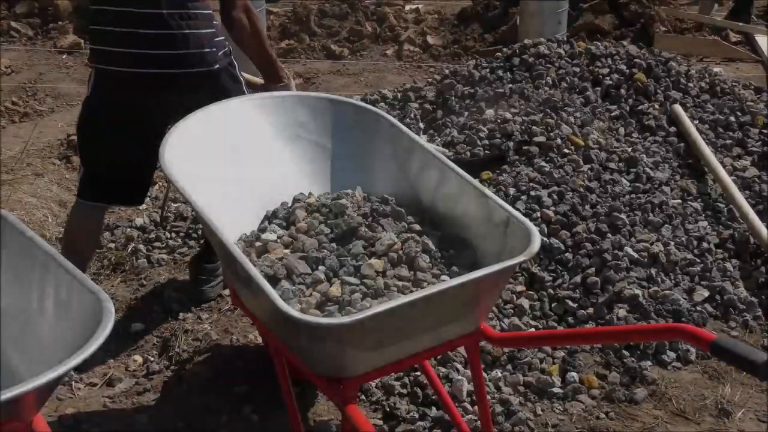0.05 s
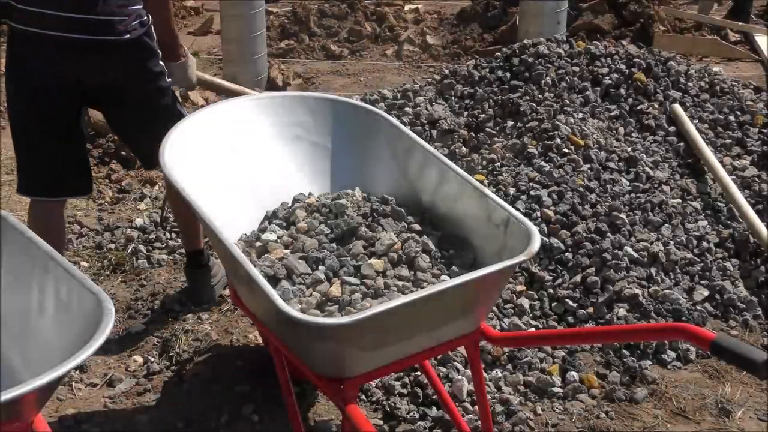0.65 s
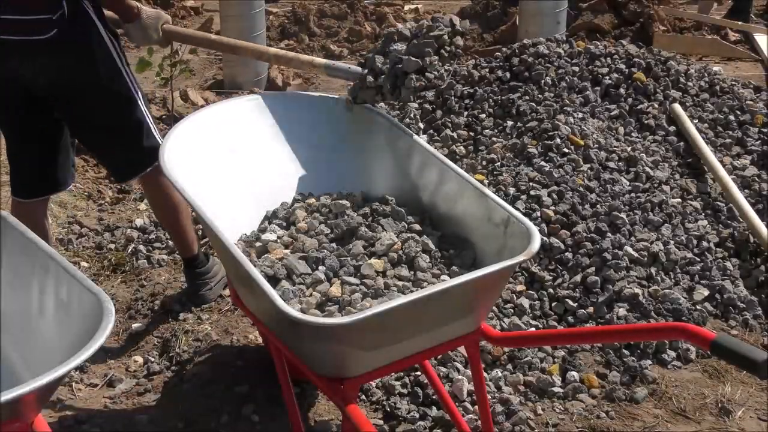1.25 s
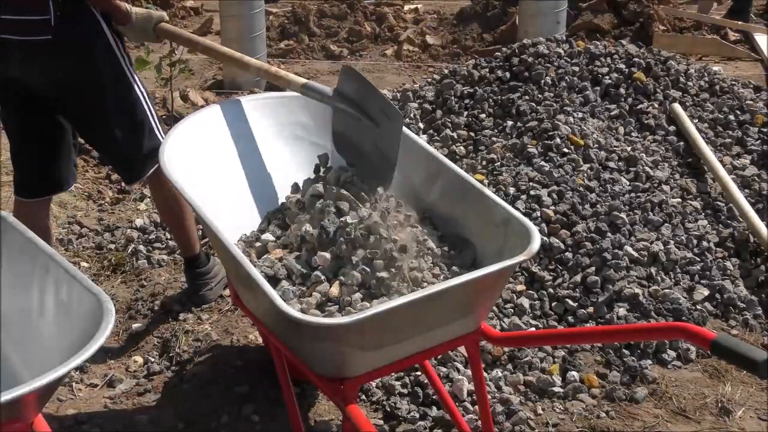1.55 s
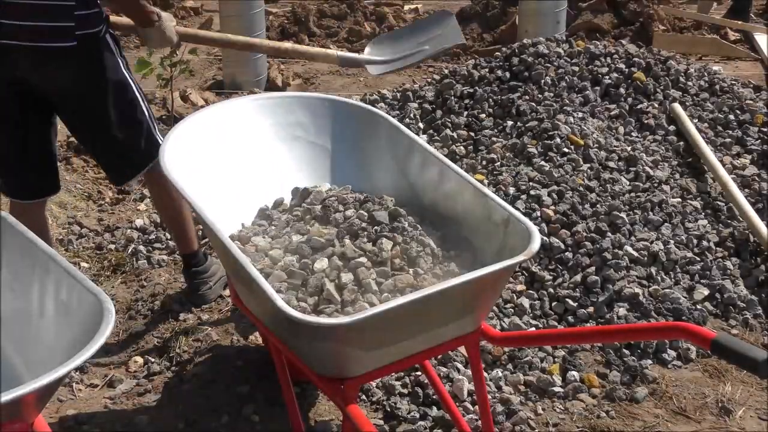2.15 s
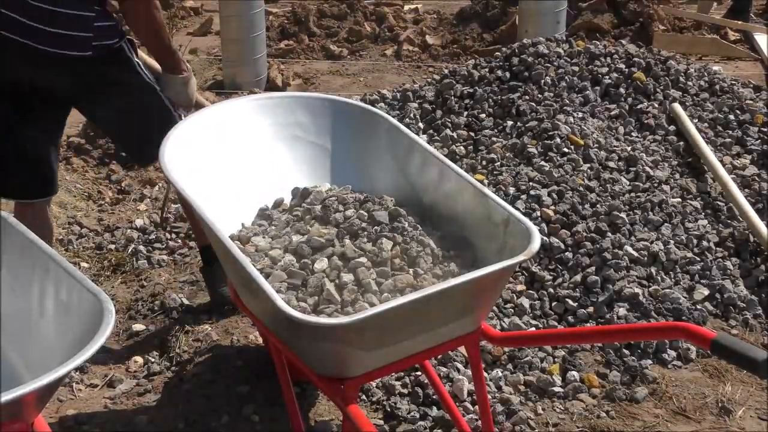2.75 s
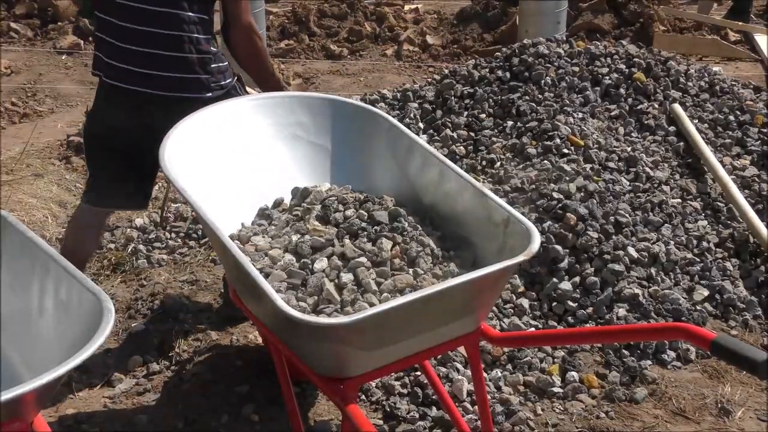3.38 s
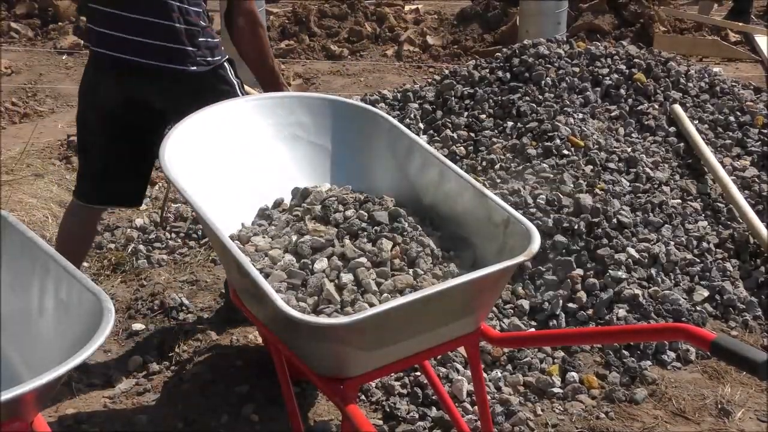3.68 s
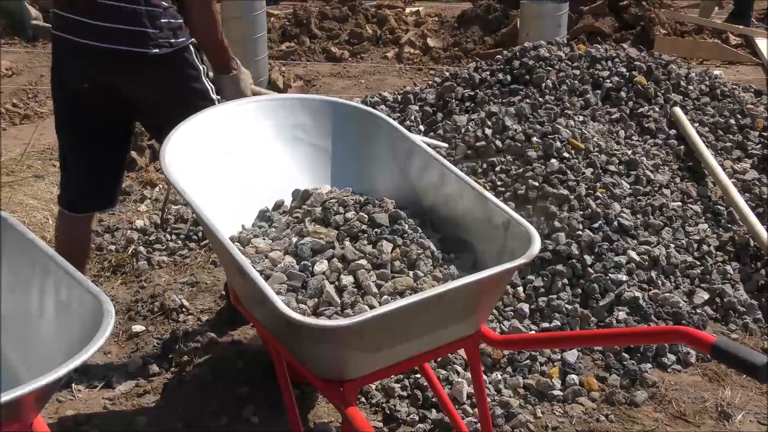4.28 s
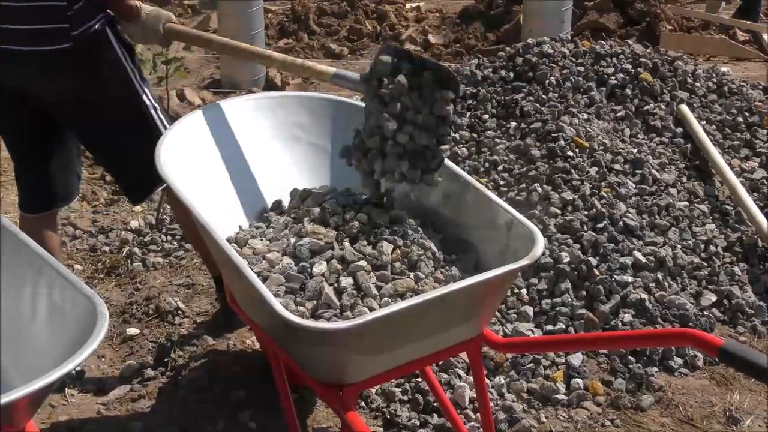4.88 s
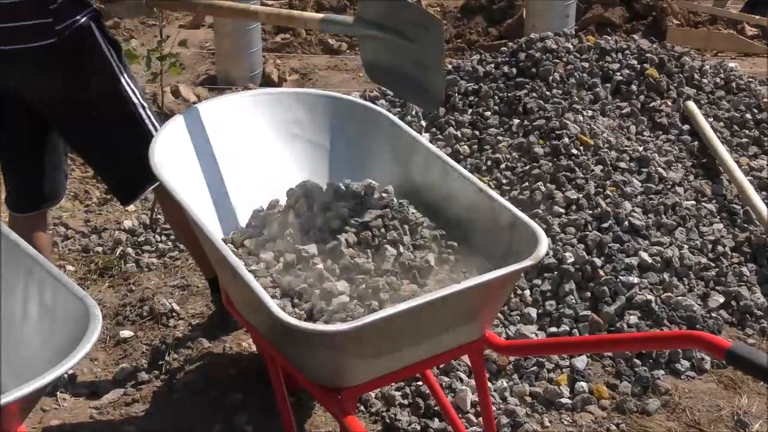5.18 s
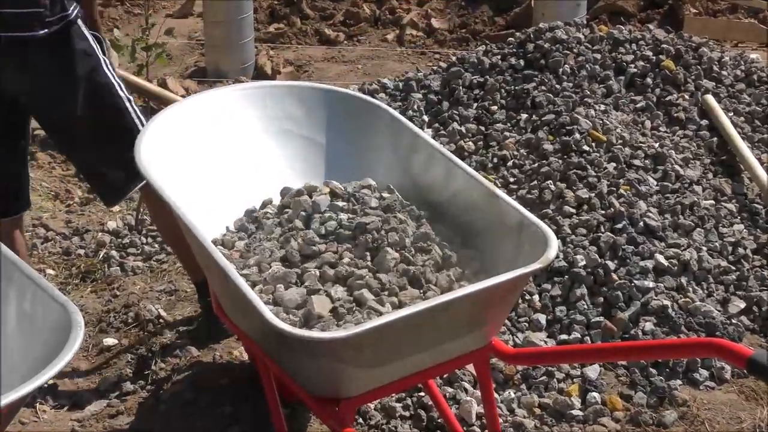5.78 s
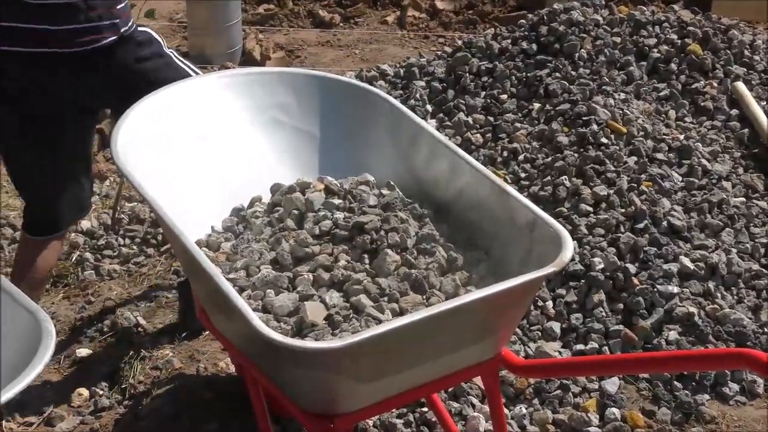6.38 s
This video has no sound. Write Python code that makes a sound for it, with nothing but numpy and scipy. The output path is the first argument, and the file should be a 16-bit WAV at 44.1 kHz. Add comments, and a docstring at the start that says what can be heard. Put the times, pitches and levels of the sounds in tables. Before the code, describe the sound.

A shovel scrapes and crunches into crushed stone and twice tips a clattering load into a metal wheelbarrow outdoors.

```python
"""Crushed stone is shovelled into a part-filled steel wheelbarrow, outdoors.
Each load slides off the ringing blade and drums into the tray, where the last stones tumble to rest.
In the pile the blade crunches and scrapes, and loose stones knock and trickle back.
Every stream of stone is a swarm of tiny noisy clacks; the steel adds its ringing modes.
At the start the blade hisses and sings as it is drawn out, over a faint bed of open air."""
import sys
import numpy as np
from scipy import signal
from scipy.io import wavfile
from scipy.ndimage import uniform_filter1d

SR = 44100
rng = np.random.default_rng(int(sys.argv[2]) if len(sys.argv) > 2 else 0)


def wav_record(signal):
    """Record a signal, one row per channel, as 16-bit PCM in the file named by sys.argv[1]."""
    frames = np.transpose(np.atleast_2d(signal))
    bounded = np.clip(frames, -1, 1)
    # unit amplitude maps onto the largest positive 16-bit level
    quanta = np.round(bounded * 32767).astype(np.int16)
    wavfile.write(sys.argv[1], SR, quanta)


N = 292499
TIME = np.arange(N) / SR


def amp(db):
    return 10 ** (np.asarray(db) / 20)


def unit_rms(x):
    return x / np.sqrt(np.mean(x ** 2) + 1e-20)


def steadied(x, size=1500):
    """Rides the level to rms 1 while single grains still stand out."""
    power = uniform_filter1d(uniform_filter1d(x ** 2, size), size)
    return x / np.sqrt(abs(power) + 1e-12)


def through(x, response):
    """Convolves, keeping the length."""
    return signal.oaconvolve(x, response)[:len(x)]


def surge(start, length, attack_s, release_db_per_s):
    """Envelope: a straight attack, a hold, then an even fall in dB."""
    age = TIME - start
    return np.clip(age / attack_s, 0, 1) * amp(-release_db_per_s * np.maximum(age - length, 0))


def colour(x, curve, size=4096):
    """Minimum-phase EQ, so attacks stay sharp; the top of the curve is set to 0 dB."""
    hz, db = np.transpose(curve)
    bins_hz = abs(np.fft.fftfreq(size, 1 / SR))
    gain_db = np.interp(np.log(bins_hz + 1), np.log(hz + 1), db - db.max())
    spectrum = np.exp(np.conj(signal.hilbert(np.log(amp(gain_db) + 1e-5))))
    return through(x, np.fft.ifft(spectrum).real[:size // 2])


def noise_band(hz, width_hz):
    """Noise through a steep resonance that glides along the curve hz; rms 1."""
    turn = np.exp(2j * np.pi * np.cumsum(hz) / SR)
    r = np.exp(-np.pi * width_hz / SR)
    band = signal.lfilter([(1 - r) ** 2], [1, -2 * r, r * r], rng.standard_normal(N) / turn)
    return unit_rms((turn * band).real)


def ring(x, modes, spot_db=4):
    """The bare contact plus the steel's modes; each spot that is struck favours other modes."""
    out = x.copy()
    for hz, db, t60 in modes:
        spots = rng.standard_normal(len(x) // 1500 + 2)
        wander = np.interp(np.arange(len(x)) / 1500, np.arange(len(spots)), spots)
        drive = x * amp(db + spot_db * wander)
        r = np.exp(-np.log(1000) / t60 / SR)
        r_cos = r * np.cos(2 * np.pi * hz / SR)
        out += signal.lfilter([2 * (1 - r), -2 * (1 - r) * r_cos], [1, -2 * r_cos, r * r], drive)
    return out


def clack(hz, t60, q, bare):
    """One stone: a fast-dying chatter of rough contacts, through a resonance set by its size."""
    t = TIME[:SR // 12]
    chatter = rng.standard_normal(len(t)) * amp(-60 * t / max(t60, .002))
    body = signal.lfilter(*signal.iirpeak(np.clip(hz, 150, 9000), q, fs=SR), chatter)
    return unit_rms(body + bare * chatter)


def gravel(flow, peak_per_s, spread_db, nominal_t60, q, sizes=36):
    """Stones of mixed size collide at random, more often in a stronger flow, a few much harder."""
    out = np.zeros(N)
    odds = peak_per_s * (flow / flow.max()) ** .6 / sizes / SR
    for hz in np.linspace(500, 9000, sizes) * rng.uniform(.9, 1.1, sizes):
        chance = rng.random(N)
        at = np.flatnonzero(chance < odds)
        force = np.minimum(-np.log(chance[at] / odds[at]), 3.5)
        clicks = np.zeros(N)
        clicks[at] = amp(spread_db * force)
        out += through(clicks, clack(hz, nominal_t60 * rng.uniform(0.21, 3.5), q, bare=0.52))
    return out


def blows(cues, curve, modes, chatter_t60, rattle_db, rattle_t60, tilt_db=0):
    """Single hard knocks, each followed by the small rattle of the neighbours that it shifts."""
    out, t = np.zeros(N), TIME[:SR // 4]
    median_hz = np.median(np.array(cues)[:, 2])
    for start, db, hz in cues:
        rattle = rng.standard_normal(len(t)) * (rng.random(len(t)) < 900 / SR)
        rattle *= amp(-60 * t / rattle_t60)
        contacts = amp(rattle_db) * rattle / np.linalg.norm(rattle)
        contacts[0] = 1  # the blow itself
        slope = tilt_db * np.log2(hz / median_hz)  # the stone's pitch tilts the EQ
        tilted = [(f, level + slope * np.log2(np.clip(f, 300, 7000))) for f, level in curve]
        bite = clack(hz, chatter_t60, q=1.9, bare=0.7)
        bite *= np.minimum(TIME[:len(bite)] / 0.0028, 1)  # rough faces take a moment to bite
        knock = ring(colour(through(contacts, bite), tilted), modes)
        attack_rms = np.sqrt(np.mean(knock[:SR // 160] ** 2))
        slot = out[round(start * SR):][:len(knock)]
        slot += amp(db) * knock[:len(slot)] / attack_rms
    return out


# EQ of the outdoor bed: (frequency [Hz], relative level [dB])
AIR_EQ = [(12, -25), (20, -3.5), (33, -13.5), (70, -6.5), (118, -18.5), (153, -12.5), (252, -11.5),
          (715, -3.5), (1030, -9.5), (1340, -8), (2030, -16), (3510, -22.5), (7300, -29), (10200, -33.5),
          (13300, -58.5), (22000, -120)]

def open_air():
    """A faint outdoor bed, and one small, low puff of wind."""
    age = np.maximum(TIME - 4.55, 0)
    puff = amp(-43) * np.exp(-age / 0.11) * np.sin(2 * np.pi * 11.0 * age)
    return amp(-57.5) * unit_rms(colour(rng.standard_normal(N), AIR_EQ)) + puff


def yard_echoes(x, wet_db, t60):
    """The dry sound plus weak scattered echoes from the ground and the heaps around."""
    t = TIME[:SR // 2]
    taps = rng.standard_normal(len(t)) * (rng.random(len(t)) < 2000 / SR)
    taps *= (t > .004) * amp(-60 * t / t60)
    return x + amp(wet_db) * through(x, taps / np.linalg.norm(taps))


# tones of the sliding blade: (base pitch [Hz], width [Hz], relative level [dB], bend depth [exponent])
SING_TONES = [(690, 110, 1, 1), (1560, 70, -2, .8), (2080, 24, 1, 1), (4170, 90, -2, .95),
              (5900, 50, -11, .58)]
# the tones bend down as more steel comes free: (time [s], pitch [ratio])
SING_BEND = [(.45, 1.05), (.61, 1), (.7, .86), (.8, .755), (.9, .735)]

def drawing_out():
    """Friction on the withdrawing blade: a fine hiss, a hollow rub and thin, sinking metallic tones."""
    sing_start_s, tip_clear_s = 0.48, 0.77
    hiss_eq = [(100, -42), (300, -12.5), (700, -7), (1500, -4.5), (3000, -9.5), (4300, -8.5),
               (5500, -16.0), (10000, -25), (13000, -50)]
    hiss = unit_rms(colour(rng.standard_normal(N), hiss_eq))
    bend = np.interp(TIME, *np.transpose(SING_BEND))
    sing = sum(amp(db) * noise_band(hz * bend ** depth, width) for hz, width, db, depth in SING_TONES)
    rub = noise_band(np.interp(TIME, [.45, .9], [335, 430]), width_hz=122)
    rub += amp(-1) * noise_band(np.interp(TIME, [.45, .9], [1000, 740]), width_hz=280)
    hiss *= surge(0, tip_clear_s, attack_s=0.018, release_db_per_s=116)
    rub *= surge(0, tip_clear_s, attack_s=0.48, release_db_per_s=34)
    sing *= surge(sing_start_s, tip_clear_s - sing_start_s, attack_s=0.14, release_db_per_s=260)
    return amp(-45) * hiss + amp(-53.5) * rub + amp(-52) * sing


# shoves of the blade in the pile: (time [s], length [s], relative level [dB], share on steel [0-1])
SHOVES = [(0.097, 0.17, -37, 0.15), (2.685, 0.093, -40, 0.22), (2.751, 0.26, -28.5, 0.11),
          (3.004, 0.088, -20.5, 0.65), (3.113, 0.15, -27, 0.4), (3.28, 0.19, -24.5, 0.16),
          (3.696, 0.099, -36.5, 0.4), (3.774, 0.038, -21.5, 0.11), (3.995, 0.14, -40.5, 0.2),
          (6.177, 0.05, -27.5, 0.1), (6.275, 0.08, -33, 0.6), (6.347, 0.28, -23.5, 0.4),
          (6.375, 0.029, -19, 0.97)]

def shoving():
    """Envelopes of stone on stone and on steel: each shove bites, stalls and leaves a trickle."""
    stone_power, steel_power = np.zeros((2, N))
    for start, length, db, steel_share in SHOVES:
        push = (amp(db) * surge(start, length, attack_s=0.039, release_db_per_s=214)) ** 2
        trickle = (amp(db - 15.5) * surge(start, length, attack_s=0.039, release_db_per_s=15.5)) ** 2
        steel_power += steel_share * push + 0.55 * trickle
        stone_power += (1 - steel_share) * push + 0.45 * trickle
    return np.sqrt(stone_power), np.sqrt(steel_power)


# EQs of the pile's crunch, grit on the blade and a lone knock: (frequency [Hz], relative level [dB])
CRUNCH_EQ = [(53, -51), (90, -36.5), (379, -12), (510, -19), (713, -2.5), (1020, -3), (1370, 1),
             (1910, -6.5), (2470, -4), (3320, -13.5), (4120, -13), (4550, -15.5), (5220, -17.5),
             (9240, -41), (10000, -55.5), (13000, -57), (22000, -120)]
SCRAPE_EQ = [(100, -34), (400, -12), (700, -12), (1300, 2), (2000, -4.5), (2500, 2.5), (3100, -7),
             (3800, -0.5), (4600, -12.5), (5500, -9), (7000, -18), (10000, -25.5), (13000, -57.5)]
KNOCK_EQ = [(59, -60), (100, -25), (505, -12), (687, -0.5), (882, -6), (1110, -2), (2310, -5), (3090, -5.5),
            (5190, -10), (10000, -33.5), (13000, -66), (22000, -120)]
# stones knocking in the pile: (time [s], relative level [dB], clack pitch [Hz])
PILE_KNOCKS = [(0.138, -17, 1570), (0.215, -24, 1720), (0.307, -21.5, 2000), (0.373, -20.5, 2320),
               (0.401, -19.5, 960), (0.509, -19.5, 2160), (0.545, -18, 750), (0.568, -26, 880),
               (1.321, -33, 783), (2.698, -20, 1320), (2.757, -14.5, 2280), (2.858, -11.5, 1570),
               (3.087, -11, 1450), (3.115, -10.5, 2600), (3.227, -9, 2400), (3.256, -14, 1310),
               (3.592, -19.5, 1470), (3.74, -20.5, 1520), (3.826, -8.5, 1370), (4.072, -16.5, 1410),
               (4.089, -13, 1200), (4.146, -17.5, 990), (4.158, -17, 1770), (4.21, -15.5, 1720),
               (4.25, -20, 2550), (4.313, -15.5, 650), (4.347, -21.5, 684), (4.407, -22.5, 2700),
               (4.423, -19.5, 1190), (4.456, -22.5, 1060), (4.575, -27.5, 2900), (6.182, -21.5, 802),
               (6.21, -17.5, 853), (6.393, -10, 1460)]

def digging(on_stone, on_steel):
    """Stones grind on each other in the pile and scratch along the buried blade, too damped to ring."""
    flow = np.hypot(on_stone, on_steel)
    grains = gravel(flow, peak_per_s=1500, spread_db=4.0, nominal_t60=0.015, q=9.0)
    crunch = on_stone * steadied(colour(grains, CRUNCH_EQ))
    grit = gravel(flow, peak_per_s=5000, spread_db=5.0, nominal_t60=0.011, q=4)
    scrape = on_steel * steadied(colour(grit, SCRAPE_EQ))
    knocks = blows(PILE_KNOCKS, KNOCK_EQ, modes=[], chatter_t60=0.02, rattle_db=-7.5, rattle_t60=0.044)
    return amp(-0.78) * crunch + amp(-0.5) * scrape + amp(-11) * knocks


# loads tipped: (time [s], rise to full flow [s], relative slide level [dB], landing time [s],
# landing length [s], relative landing level [dB], settling length [s])
POURS = [(1.393, 0.12, -21, 1.76, 0.067, -21, 0.49), (4.743, 0.23, -20, 5.17, 0.18, -25, 0.61)]

def tipping():
    """Envelopes of stone sliding off the tilting blade and of stone landing and settling in the tray."""
    sliding, landing = np.zeros((2, N))
    for start, tilt_s, slide_db, lands_at, land_s, land_db, creep_s in POURS:
        tilt = np.clip((TIME - start) / tilt_s, 0, 1)
        thinning_db = 29.5 * np.maximum(TIME - start - tilt_s, 0)  # the blade empties
        dying_db = 117 * np.maximum(TIME - lands_at, 0)  # the bulk has landed
        sliding += tilt ** 2.03 * amp(slide_db - thinning_db - dying_db)
        bulk = surge(lands_at, land_s, attack_s=0.027, release_db_per_s=176)
        creep = (TIME > lands_at) * np.clip(1 - (TIME - lands_at - land_s) / creep_s, 0, 1)
        landing += amp(land_db) * np.hypot(bulk, amp(-13) * creep)
    early_stones = amp(-13) * sliding  # some already land during the slide
    return sliding, np.hypot(landing, early_stones)


# EQs of the slide and of one stone tapping the bare blade: (frequency [Hz], relative level [dB])
SLIDE_EQ = [(120, -60), (200, -20), (425, -12.5), (560, -13), (700, 1), (1200, -3), (1800, -1.5),
            (2500, 0.5), (3000, -5), (3800, -4), (5400, -9.5), (7000, -17.5), (10000, -27.5),
            (13000, -64.5)]
TICK_EQ = [(100, -51), (500, -22), (1200, -0.5), (2500, -3), (4000, -1), (6000, -5), (10000, -25.5),
           (13000, -65)]
# modes of the steel blade under the slide: (frequency [Hz], level over the bare clack [dB], t60 [s])
BLADE_MODES = [(1080, -1, .035), (1260, 3, .12), (1460, -2, .05), (2062, -2, .06), (2137, -1, .1),
               (2377, 9, .15), (2457, 4, .07), (2600, 5, .1), (2837, 3, .12), (3190, 1, .1), (3347, 4, .13),
               (3560, 4, .15), (3744, 10, .16), (3985, 7, .12), (4404, 3, .13), (4810, 2, .08),
               (6758, 5, .12)]
# stones striking the blade: (time [s], relative level [dB], clack pitch [Hz])
BLADE_TICKS = [(1.0155, -43.5, 2340), (1.0365, -43, 2320), (1.1956, -27.5, 3170), (1.2164, -39.5, 2420),
               (1.5414, -9.5, 2400), (1.612, -14.5, 3300), (1.7158, -13.5, 2570), (4.6546, -32, 2460),
               (4.7891, -20, 2600), (4.8239, -21.5, 5900), (5.0046, -11, 2510), (5.092, -10.5, 2420)]

def blade_slide(sliding, flow):
    """The load skids off the freely ringing blade; single stones tick with a softer, shorter ring."""
    grains = gravel(flow, peak_per_s=3600, spread_db=3.5, nominal_t60=0.009, q=2.8)
    slide = sliding * steadied(ring(colour(grains, SLIDE_EQ), BLADE_MODES))
    tick_modes = [(hz, db - 13, t60 / 2) for hz, db, t60 in BLADE_MODES]
    ticks = blows(BLADE_TICKS, TICK_EQ, tick_modes, chatter_t60=0.027, rattle_db=-17, rattle_t60=0.06)
    return amp(-0.8) * slide + amp(-9) * ticks


# EQ of stone landing in the tray: (frequency [Hz], relative level [dB])
TRAY_EQ = [(41, -62), (70, -47.5), (167, -18.5), (224, -20.5), (276, -13), (361, -5.5), (503, -5.5),
           (606, -3), (701, -4), (1640, -4), (1790, -5), (2060, -5), (5150, -15), (8300, -33),
           (10000, -43.5), (13000, -79), (22000, -120)]
# modes of the tray, damped by its load: (frequency [Hz], level over the bare clack [dB], t60 [s])
TRAY_MODES = [(135, -3, .1), (172, -2, .12), (295, -7, .08), (385, -5, .09), (441, 0, .12), (513, 2, .13),
              (705, -4, .1), (790, -6, .09), (1012, -6, .1), (1184, -3, .12), (1260, 1, .17),
              (1378, -4, .12), (1690, -2, .14)]
# stones dropping into the tray: (time [s], relative level [dB], clack pitch [Hz])
TRAY_HITS = [(1.427, -24.5, 1470), (1.484, -16, 1120), (1.761, -10, 670), (1.871, -12.5, 1030),
             (1.923, -23, 638), (1.974, -27, 1050), (2.003, -23.5, 1370), (2.069, -18.5, 390),
             (2.092, -22.5, 692), (2.119, -18, 1030), (2.184, -19, 534), (2.228, -27, 1050),
             (5.174, -9, 730), (5.203, -13.5, 439), (5.246, -12, 1050), (5.312, -10, 519),
             (5.424, -18.5, 425), (5.466, -24.5, 1260), (5.585, -22, 1310), (5.624, -16, 920),
             (5.681, -18.5, 1510), (5.75, -28, 980)]

def tray_landing(landing, flow):
    """The load showers onto the stone in the barrow and drums the steel tray beneath."""
    grains = gravel(flow, peak_per_s=2200, spread_db=5.5, nominal_t60=0.023, q=7.3)
    shower = landing * steadied(ring(colour(grains, TRAY_EQ), TRAY_MODES))
    hits = blows(TRAY_HITS, TRAY_EQ, TRAY_MODES, chatter_t60=0.049, rattle_db=-3, rattle_t60=0.075,
                 tilt_db=-0.6)
    return amp(-1) * shower + amp(-10) * hits


def scene():
    """Digging and pouring in a yard with short echoes, over the open air; mono."""
    at_pile = digging(*shoving()) + drawing_out()
    sliding, landing = tipping()
    flow = np.hypot(sliding, landing)
    at_barrow = blade_slide(sliding, flow) + tray_landing(landing, flow)
    return (yard_echoes(at_pile + at_barrow, wet_db=-19.5, t60=0.098) + open_air())[None]


def record(dry):
    """A steep treble cut, and a faint hiss that reaches a little higher."""
    def low_pass(x, edge_hz):
        taps = signal.firwin(401, edge_hz, window=("kaiser", 8), fs=SR)
        return signal.oaconvolve(x, taps[None], "same")
    hiss = amp(-75) * rng.standard_normal(dry.shape)
    return low_pass(low_pass(dry, edge_hz=10120) + hiss, edge_hz=15700)


dry = scene()
out = record(dry)
wav_record(out)
```